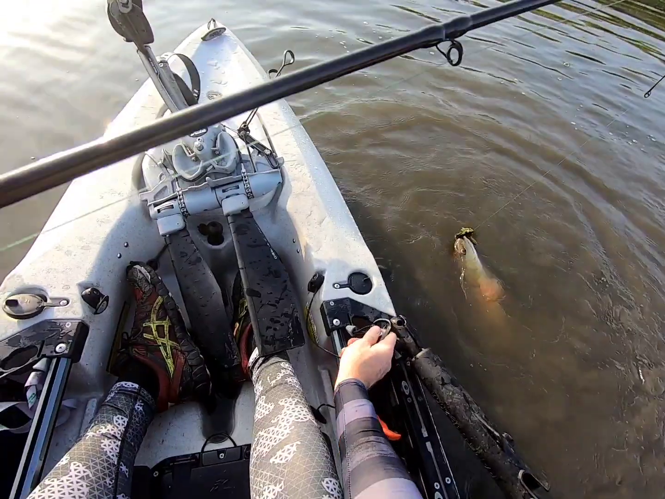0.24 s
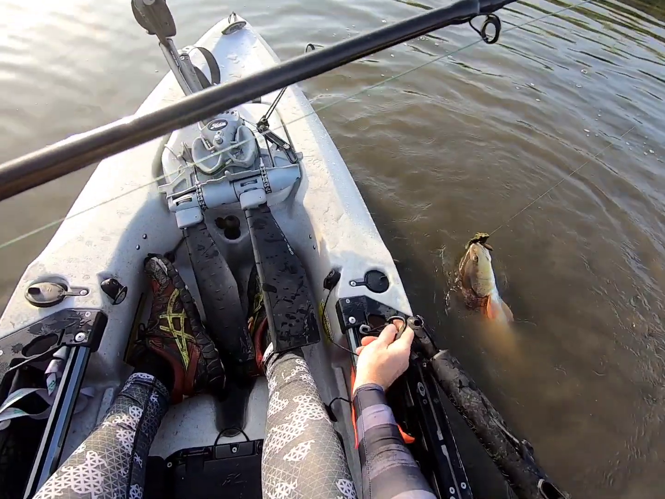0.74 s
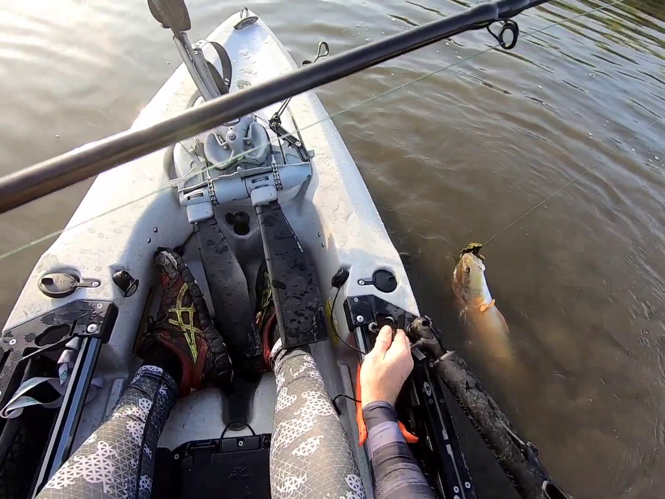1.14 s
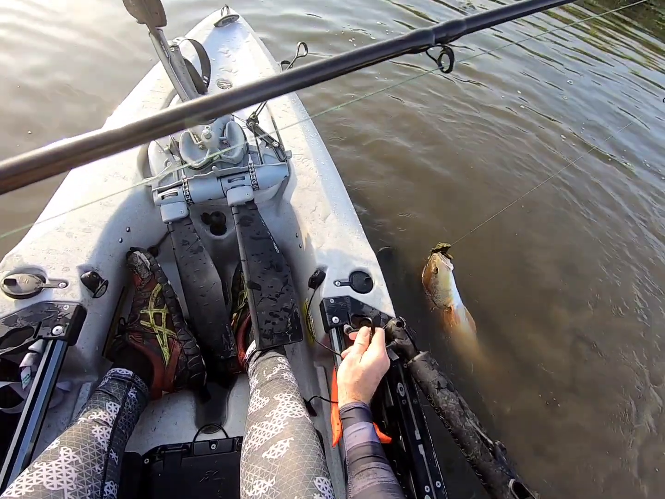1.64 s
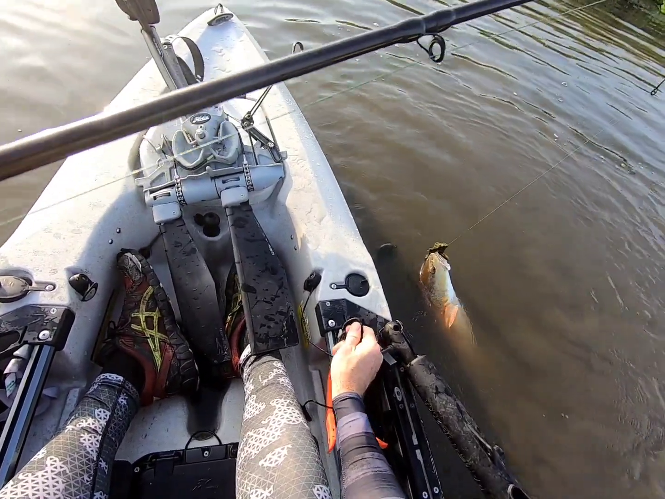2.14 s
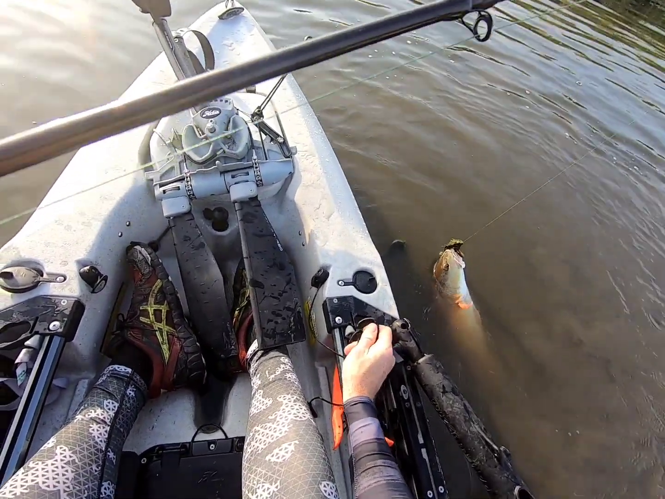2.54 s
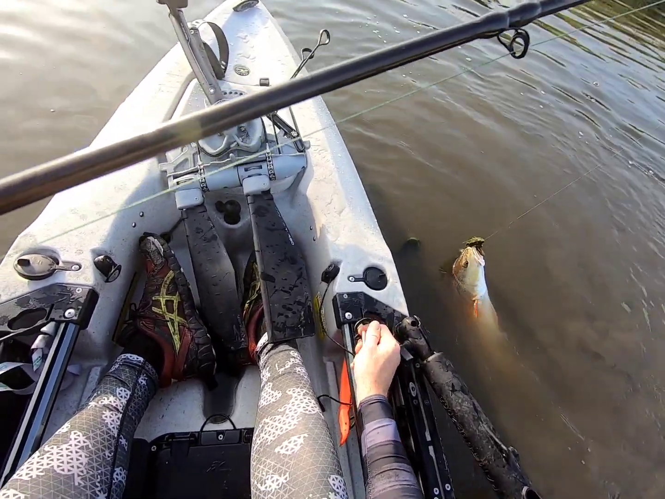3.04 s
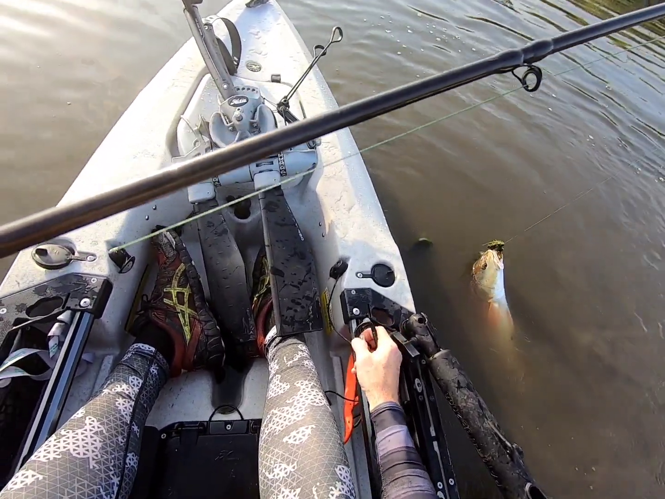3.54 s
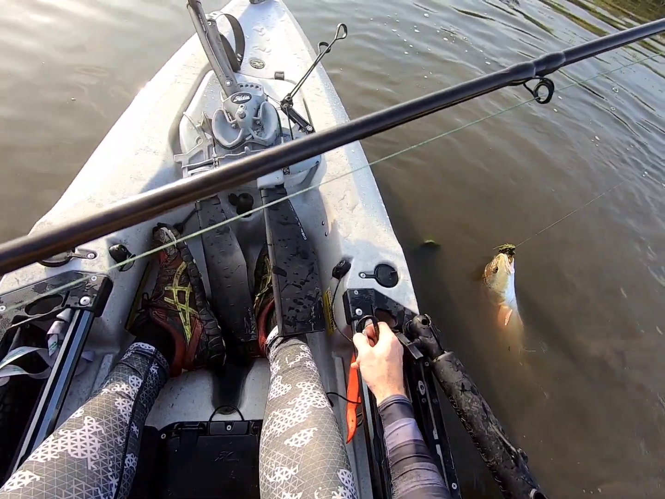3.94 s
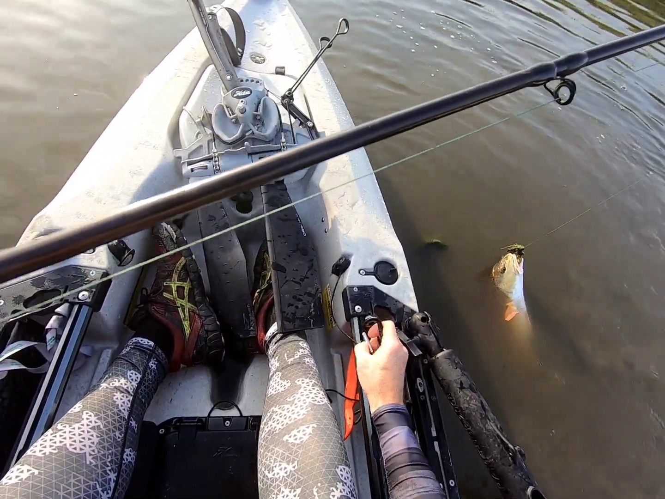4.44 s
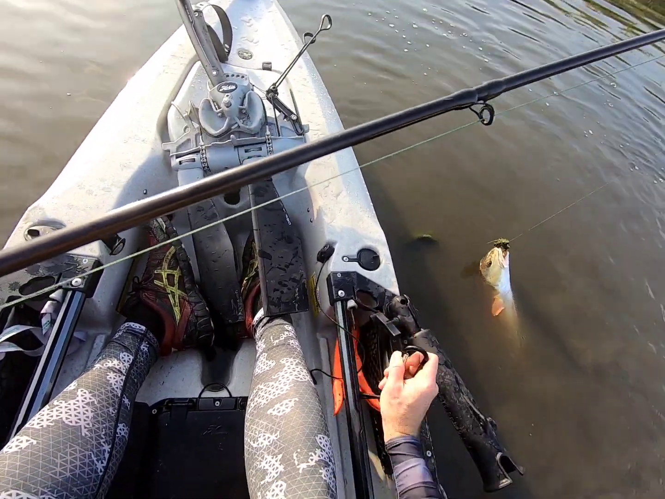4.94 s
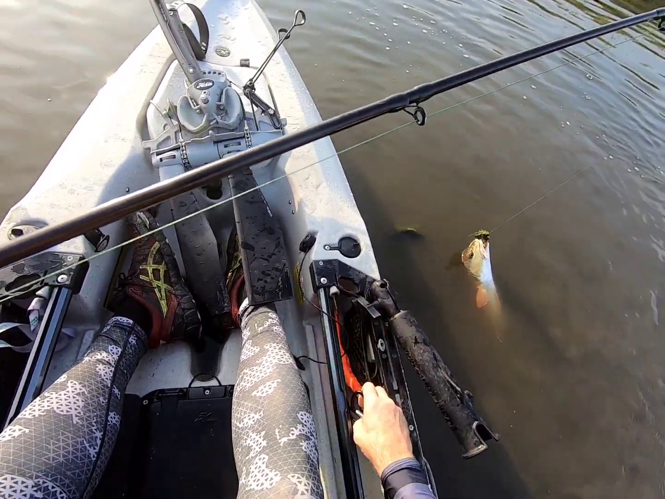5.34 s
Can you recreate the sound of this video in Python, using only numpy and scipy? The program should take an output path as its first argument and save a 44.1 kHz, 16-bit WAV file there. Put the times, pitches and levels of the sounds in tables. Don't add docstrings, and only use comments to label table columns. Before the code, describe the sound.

Steady high insect drone around a small hollow boat, with wind rumbling on the microphone, small knocks and water plops, then a loud booming double thump at the end.

```python
import sys
import numpy as np
from scipy import signal
from scipy.fft import rfft, irfft, next_fast_len
from scipy.io import wavfile
from scipy.ndimage import uniform_filter1d, map_coordinates

SR = 44100
rng = np.random.default_rng(int(sys.argv[2]) if len(sys.argv) > 2 else 0)


def persist_wave(psi):
    counts = np.round(np.clip(psi, -1, 1) * 32767).astype(np.int16)
    wavfile.write(sys.argv[1], SR, np.atleast_2d(counts).T)


def to_linear_factor(level_db):
    exponent = np.asarray(level_db, float) / 20
    return 10 ** exponent


N = 246367


def unit(x):
    return x / np.sqrt(np.mean(x ** 2) + 1e-20)


def along(points, hz):
    f, v = np.transpose(points)
    return np.interp(np.log(hz + 1), np.log(f + 1), v)


def curves(rows):
    s, *cols = np.transpose(rows)
    return [np.interp(np.arange(N) / SR, s, c) for c in cols]


def wobble(rate):
    knots = rng.standard_normal(int(N * rate / SR) + 4)
    return map_coordinates(knots, [np.arange(N) * rate / SR])


def filtered(x, response):
    m = next_fast_len(N + 8192)
    return irfft(rfft(x, m) * response(np.fft.rfftfreq(m, 1 / SR)), m)[..., :N]


def panned(db):
    return to_linear_factor(np.multiply.outer([.5, -.5], db))


def rush(spectrum, alike, patchy_db):
    z = signal.stft(rng.standard_normal((2, N)), nperseg=512)[2]
    field = uniform_filter1d(rng.standard_normal(z.shape[1:]), size=5, axis=0)
    field = uniform_filter1d(field, size=8, axis=1)
    pair = signal.istft(z * to_linear_factor(patchy_db * unit(field)), nperseg=512)[1][:, :N]

    def mid_side_response(hz):
        turn = np.arccos(np.clip(along(alike, hz), -1, 1)) / 2
        return to_linear_factor(along(spectrum, hz)) * [np.cos(turn), np.sin(turn)]

    mid, side = filtered(pair, mid_side_response)
    return unit(np.array([mid + side, mid - side]))


def add(track, s, sound):
    part = track[..., round(s * SR):][..., :sound.shape[-1]]
    part += sound[..., :part.shape[-1]]


def strokes(rows, rise, fall):
    t = np.arange(N) / SR
    total = np.zeros(N)
    for s, length, db in rows:
        onset = np.clip((t - s) / rise, 0, 1)
        release = np.exp(-np.clip(t - s - length, 0, None) / fall)
        total += to_linear_factor(db) * onset * release
    return total


# time in seconds, level in dB.
CHORUS_LEVEL = [(0, -46), (2, -46), (3.5, -45), (5.59, -46)]
# frequency in Hz, level in dB per Hz.
WING_RESONANCE = [(3060, -75), (5200, -42.5), (5940, -22), (6260, -10.5), (6480, -2), (6800, 4.5),
                  (7150, -4), (7270, -20), (7510, -23.5), (7630, -31), (9000, -52.5), (11700, -82),
                  (19800, -120)]


def insects(count=30):
    clicks = np.zeros((2, N))
    for rate, lag, side in rng.random((count, 3)):
        clicks_per_s = 170 + 160 * rate
        gaps = SR / clicks_per_s * (1 + .3 * rng.standard_normal(N // 100))
        times = np.cumsum(gaps).astype(int)
        at = times[(times >= 0) & (times < N - 8)]
        size = to_linear_factor(1.7 * wobble(12))[at]
        delay = round(1.7 + 3.9 * lag)
        clicks[0, at] += size * np.cos(np.pi / 2 * side)
        clicks[1, at + delay] += size * np.sin(np.pi / 2 * side)
    song = filtered(clicks, lambda hz: to_linear_factor(along(WING_RESONANCE, hz)))
    level = to_linear_factor(curves(CHORUS_LEVEL)[0] + 3.5)
    return level * panned([-5.8]) * np.array([unit(port) for port in song])


# start in seconds, hold in seconds, strength in dB, left minus right in dB.
GUST_EVENTS = [(0, 0.13, -44.5, -12), (0.28, 0.15, -50.5, 4), (0.708, 0.14, -38, -15.5),
               (0.883, 0.14, -39, -12), (1.057, 0.31, -41, -4.5), (1.41, 0.44, -47, -12),
               (1.974, 0.22, -45, -6), (2.173, 0.1, -50.5, 2), (2.44, 0.03, -55, -14.5),
               (0.515, 0.056, -55.5, -2), (4.4, 0.061, -61, -5), (3.288, 0.056, -50, -10),
               (3.601, 0.072, -53, 2.5), (3.788, 0.063, -48.5, -14), (4.566, 0.22, -43, 7),
               (4.688, 0.031, -29.5, -11.5), (4.786, 0.066, -33.5, 6), (5.09, .12, -57, -5),
               (5.262, 0.077, -46, -11), (5.417, .2, -32.5, -6.5)]


def gusts():
    s, hold, db, pan_db = np.transpose(GUST_EVENTS)[..., None]
    t = np.arange(N) / SR
    rise_db_per_s, fall_db_per_s, calm_db = 397, 273.5, -77.5
    before = np.clip(s - t, 0, None)
    after = np.clip(t - s - hold, 0, None)
    power = to_linear_factor(db - rise_db_per_s * before - fall_db_per_s * after) ** 2
    total = power.sum(axis=0) + to_linear_factor(calm_db) ** 2
    return 10 * np.log10(total), (power * pan_db).sum(axis=0) / total


# frequency in Hz, level in dB per Hz.
BUFFET_SPECTRUM = [(12, -27.5), (20, 0.5), (54, 2.5), (88, -5), (119, -8), (327, -31.5), (400, -37.5),
                   (520, -49.5), (880, -120)]


def wind():
    buffet_db, pan_db = gusts()
    lumps = to_linear_factor(2.7 * np.array([wobble(22.0), wobble(22.29)]))
    full = unit(lumps * rush(BUFFET_SPECTRUM, [(30, 0.058)], patchy_db=2.0))
    deep = filtered(full, lambda hz: 1 / (1 + (hz / 75) ** 4))
    strong = np.clip((buffet_db + 57) / 14, 0, 1)
    return to_linear_factor(buffet_db) * panned(pan_db) * (deep + strong * (full - deep))


# time in seconds, strength in dB.
BREEZE_STRENGTH = [(0, -84), (.8, -85), (1.25, -88.5), (1.5, -91.5), (2.2, -93), (3.0, -92.5),
                   (3.06, -89.5), (3.5, -87), (4.6, -88), (4.8, -91), (5.1, -84), (5.35, -89), (5.59, -78)]
# frequency in Hz, level in dB per Hz.
REED_SPECTRUM = [(5470, -42), (9300, -1), (9500, -6), (10200, -0.5), (10700, -1), (11700, -5.5),
                 (12900, -2.5), (13600, -4), (14200, -8), (15500, -12.5)]
# frequency in Hz, level in dB per Hz.
MARSH_SPECTRUM = [(35, -26), (60, -4), (112, -11), (259, -4), (532, -16.5), (608, -7.5), (1030, -11.5),
                  (1270, -20), (1400, -16.5), (2520, -32.5), (5600, -31), (7280, -46.5), (12300, -120)]
# frequency in Hz, left-right likeness from -1 to 1.
MARSH_COHERENCE = [(60, 0.49), (180, 0.038), (550, -0.89), (1650, -0.99), (4970, 0.46), (15000, -0.41)]


def marsh():
    breeze = to_linear_factor(curves(BREEZE_STRENGTH)[0] + 5.5)
    reeds = breeze * rush(REED_SPECTRUM, [(9000, 0.071)], patchy_db=2.5)
    return reeds + to_linear_factor(-66.5) * rush(MARSH_SPECTRUM, MARSH_COHERENCE, patchy_db=1.0)


# time in seconds, effort in dB.
HAND_EFFORT = [(0, -58.5), (.19, -54.5), (.37, -64.5), (.61, -64), (.75, -48), (.86, -56.5), (1.2, -56),
               (1.6, -68), (2.0, -66), (2.35, -62), (2.8, -72.5), (3.15, -62.5), (4.05, -69.5), (4.33, -65),
               (4.76, -60), (4.86, -48), (5.33, -51), (5.59, -34.5)]
# frequency in Hz, level in dB per Hz.
RUMBLE_SPECTRUM = [(59, -41.5), (100, -10.5), (199, 5.5), (232, -2), (322, 1), (438, -17.5), (509, -22),
                   (600, -16.5), (780, -51), (1320, -120)]
# frequency in Hz, level in dB per Hz.
RUSTLE_SPECTRUM = [(240, -35), (400, -9), (447, -4.5), (650, -9), (767, -3), (1190, -12.5), (1640, -13.5),
                   (2730, -20), (3520, -17.5), (4300, -24), (5600, -25), (7280, -51.5), (12300, -120)]


def handling():
    rumble_db, = curves(HAND_EFFORT)
    usual_effort_db, growth = -60.5, 0.93
    rustle_db = -68.5 + growth * (rumble_db - usual_effort_db)
    slip = wobble(35)
    rumble = rush(RUMBLE_SPECTRUM, [(150, 0.87), (300, 1.0)], patchy_db=3.0)
    rumble = unit(to_linear_factor(4.5 * slip) * rumble)
    rustle = rush(RUSTLE_SPECTRUM, [(500, 0.17), (3000, 0.44)], patchy_db=3.5)
    rustle = unit(to_linear_factor(0.53 * slip + 0.91 * wobble(130)) * rustle)
    return panned([-1.5]) * (to_linear_factor(rumble_db) * rumble + to_linear_factor(rustle_db) * rustle)


# start in seconds, peak in dB, pitch in Hz, left minus right in dB.
SLAP_EVENTS = [(0.031, -37.5, 73, -33.5), (0.691, -36, 62.5, -14), (0.804, -22.5, 61.8, -11),
               (0.832, -26, 100, -15), (0.891, -34, 81, -15), (0.963, -33, 62.3, -28),
               (1.144, -40, 62.5, -17), (1.311, -33.5, 123, -36.5), (1.417, -36, 91, -23.5),
               (1.527, -35.5, 68, -24), (1.622, -32, 63.5, -22), (1.699, -35, 85, -18),
               (1.783, -42, 71, -29), (2, -33.5, 69, -25.5), (2.122, -31.5, 102, -2),
               (2.457, -40.5, 70, -15), (2.509, -45.5, 50.4, -16), (3.288, -46.5, 61.5, -20),
               (3.328, -51, 61, -16), (3.799, -36, 29.6, -18), (3.851, -36.5, 31, -15),
               (4.669, -29, 76, 12), (4.718, -25, 63, -22), (4.795, -29.5, 169, 19), (4.807, -23, 68.4, 5),
               (5.4003, -21, 110, -16.5), (5.4484, -18.5, 109, -22), (5.466, -21, 187, -18),
               (5.535, -21, 70.0, -17), (5.548, -34, 72.7, -8)]


def slaps():
    out = np.zeros((2, N))
    for s, db, hz, pan_db in SLAP_EVENTS:
        u = np.arange(round(2 * SR / hz)) * hz / SR - .7
        soft_start = 1 - np.exp(-((u - u[0]) / 0.2) ** 2)
        dip = -np.cos(2 * np.pi * u) * np.exp(-(u / 0.56) ** 2) * soft_start
        add(out, s, panned([pan_db]) * to_linear_factor(db - 4.5) * dip)
    return out


# start in seconds, length in seconds, level in dB.
DRAG_EVENTS = [(0.134, 0.13, -63), (0.544, 0.077, -59), (0.626, 0.12, -62), (0.732, 0.05, -52.5),
               (4.018, 0.056, -56), (4.826, 0.053, -69), (1.65, .07, -68), (3.76, .14, -69),
               (2.403, 0.026, -60.5), (2.356, 0.017, -66), (2.866, 0.042, -63), (5.273, 0.026, -47),
               (5.337, 0.2, -53), (5.51, 0.079, -60)]


def drags():
    grains = to_linear_factor(1.5 * wobble(74) + 1.0 * wobble(300))
    rub = rush(RUSTLE_SPECTRUM, [(500, 0.23), (3000, 0.82)], patchy_db=4.0)
    return strokes(DRAG_EVENTS, rise=0.0064, fall=0.015) * unit(grains * rub)


# start in seconds, length in seconds, level in dB.
SPRAY_EVENTS = [
    (4.017, 0.058, -55.5),
    (5.128, .03, -70),
    (6.3, .02, -66),
    (5.525, .08, -61.5),
    (.18, .03, -74),
]
# frequency in Hz, level in dB.
SPRAY_SPECTRUM = [(3000, -32), (6000, 0.5), (8500, 1), (10000, -3), (11000, -14), (15500, -24)]


def sprays():
    grains = to_linear_factor(3.0 * wobble(370)) * rush(SPRAY_SPECTRUM, [(9000, .2)], patchy_db=-5.0)
    return strokes(SPRAY_EVENTS, rise=.02, fall=0.011) * unit(grains)


def drifting_rings(rows, attack, pan_db):
    out, t = np.zeros((2, N)), np.arange(SR // 5) / SR
    for s, db, hz, t60, drift in rows:
        tone = np.sin(2 * np.pi * hz * (t + drift * t * t / t60))
        envelope = to_linear_factor(db + 1.0 - 60 * t / t60) * (1 - np.exp(-t / attack))
        add(out, s, panned([pan_db]) * envelope * tone)
    return out


# start in seconds, peak in dB,
# pitch in Hz, t60 in seconds, pitch drift share.
PLOP_EVENTS = [(.253, -49, 1370, 0.038, .15), (.314, -40, 1370, 0.044, -0.2), (.79, -48, 774, 0.13, -0.21),
               (.838, -40, 695, 0.027, -.032), (1.0245, -27.5, 950, 0.025, -0.012),
               (1.021, -28, 467, 0.037, 0.085), (1.06, -46.5, 506, 0.081, .037),
               (1.2, -46.5, 754, 0.082, -0.059), (4.033, -23.5, 880, 0.023, -0.037),
               (4.694, -44, 870, 0.025, 0), (.18, -60, 7600, .08, 0), (5.2945, -42, 2600, .03, 0),
               (4.855, -54, 3500, .06, 0)]


def plops():
    return drifting_rings(PLOP_EVENTS, attack=0.0034, pan_db=-5.5)


# start in seconds, strength in dB, panel in Hz, fitting in Hz, sharpness in dB.
BLOW_EVENTS = [(0.6834, -44, 148, 2320, 1), (0.7197, -57.5, 327, 2840, 19.5), (0.7415, -33.5, 210, 1880, 2),
               (0.7576, -50, 263, 2140, 1), (2.413, -46.5, 291, 1540, 1), (4.0292, -43, 388, 2100, 3),
               (4.0476, -46, 254, 2210, -15), (4.957, -58, 330, 1940, -3), (5.2774, -40, 198, 1670, 5.5),
               (5.2962, -38, 216, 1300, -3), (5.3425, -47, 188, 1780, 5.5), (5.3551, -38.5, 320, 2530, -8),
               (5.3788, -39.5, 197, 3030, -1), (5.4263, -43, 198, 1920, 0.5), (5.4897, -26, 300, 3640, 5.5),
               (5.5121, -24.5, 209, 2300, 1.5)]
# start in seconds, strength in dB, panel in Hz, deck over panels in dB.
BUMP_EVENTS = [(0.215, -49, 201, -30), (0.587, -49, 250, -25), (0.8653, -43.5, 296, 0.5),
               (1.0253, -47, 430, 7), (1.5617, -49, 169, 2.7), (1.7121, -57, 162, -1.5),
               (1.998, -48.5, 157, -5.5), (2.0591, -57, 287, 4.5), (2.205, -51.5, 151, -7),
               (2.362, -42.5, 336, -2), (2.4384, -52, 169, 4.5), (2.8706, -70.5, 193, 9.5),
               (3.0973, -58, 293, 2.5), (4.1382, -56.5, 253, 3), (4.2533, -52, 168, -2),
               (4.2823, -50.5, 440, 2.2), (4.5351, -55.5, 172, -1.5), (4.568, -53, 302, 6),
               (4.61, -48, 308, 3.5)]
# start in seconds, strength in dB, fitting in Hz, panels over fitting in dB.
TAP_EVENTS = [(0.311, -52, 1830, -6.5), (0.553, -58.5, 3500, 5.5), (0.662, -46, 3430, -10),
              (0.9766, -50, 3430, -5), (1.0266, -51.5, 1980, -11), (1.766, -49, 3250, -21),
              (2.1338, -52, 3680, -2.5), (2.551, -56, 3140, -12), (2.8789, -30.5, 2600, -28),
              (2.8822, -44.5, 2460, -22), (3.312, -49.5, 2030, -32), (4.0701, -33, 3060, -21.5),
              (5.157, -45, 2460, -7), (5.1818, -45.5, 2130, -5.5), (5.232, -46, 2900, -19),
              (0.361, -59, 2880, -15), (0.454, -60, 3100, -18), (4.2522, -54.5, 2920, -11),
              (4.846, -52, 3500, -18), (4.861, -53, 3500, -21), (2.911, -60, 4000, -3)]


def contacts():
    rows = []
    for s, db, panel_hz, fitting_hz, sharp_db in BLOW_EVENTS:
        rows.append((s, db + sharp_db, fitting_hz, db, db + 2.5, panel_hz))
    for s, db, panel_hz, deck_db in BUMP_EVENTS:
        rows.append((s, db - 19.5, 2100, db, db + deck_db, panel_hz))
    for s, db, fitting_hz, body_db in TAP_EVENTS:
        rows.append((s, db, fitting_hz, db + body_db, db + body_db - 24, 194.5))
    return rows


def ring(modes, t, attack):
    hz, db, t60 = np.transpose(modes)[..., None]
    luck = rng.standard_normal((2, len(modes), 1))
    decay = to_linear_factor(db + 2.9 * luck[0] - 60 * t / t60)
    x = np.sum(decay * np.sin(2 * np.pi * hz * (1 + 0.045 * luck[1]) * t), axis=0)
    x = x * (1 - np.exp(-t / attack))
    return x / np.abs(x).max()


def burst(colour, t, t60, attack):
    spectrum = rfft(rng.standard_normal(len(t)))
    gain = to_linear_factor(along(colour, np.fft.rfftfreq(len(t), 1 / SR)))
    x = irfft(spectrum * gain, len(t)) * to_linear_factor(-60 * t / t60) * (1 - np.exp(-t / attack))
    return x / np.abs(x).max()


# frequency in Hz, level in dB, t60 in seconds.
PANEL_MODES = [(169.2, -2, 0.15), (213.5, -4, 0.18), (259.8, 3, 0.08), (320, 3.5, 0.065),
               (396.3, -10, 0.18)]
# frequency in Hz, level in dB, t60 in seconds.
DECK_MODES = [(501, 6, 0.048), (740, -5, 0.038), (880, 7, 0.027), (962, 6.5, 0.024), (1336, -7, 0.036)]
# frequency in Hz, level in dB, t60 in seconds.
FITTING_MODES = [(1704, -1.5, 0.02), (2340, -9, 0.014), (2480, 11.5, 0.017), (3300, -7, 0.01),
                 (3840, -4.5, 0.006), (4900, -13.5, 0.004)]
# frequency as a share of the fitting's pitch, level in dB.
SNAP_SPECTRUM = [(.2, -55.5), (.45, -17), (.8, -5), (1, -0.5), (1.3, -7), (1.7, -16), (2.8, -42.5),
                 (5, -63)]
# frequency in Hz, level in dB.
RAP_SPECTRUM = [(150, -50), (280, -28), (450, 6), (800, 6.5), (1200, -9.5), (1800, -32.5), (4000, -71)]


def knocks():
    out, t = np.zeros(N), np.arange(SR // 5) / SR
    for s, click_db, click_hz, thud_db, knock_db, panel_hz in contacts():
        thud = ring([(panel_hz, 7, .065)] + PANEL_MODES, t, attack=0.0036)
        deck = ring(DECK_MODES, t, attack=0.0038)
        rap = burst(RAP_SPECTRUM, t, 0.061, attack=0.0017)
        fitting = ring([(click_hz, 7, .015)] + FITTING_MODES, t, attack=0.00094)
        snap = burst(np.multiply(SNAP_SPECTRUM, [click_hz, 1]), t, 0.019, attack=0.0014)
        add(out, s, to_linear_factor(thud_db + 6.0) * thud)
        add(out, s, to_linear_factor(knock_db + 4) * (0.43 * deck + 0.41 * rap))
        add(out, s, to_linear_factor(click_db - 3.0) * (0.31 * fitting + 1.07 * snap))
    return out * panned([-1.5])


# start in seconds, peak in dB, left minus right in dB.
TICK_EVENTS = [(0.6695, -65.5, 22.5), (1.6057, -65, 18), (3.5982, -59, -11), (4.028, -52, 5.5),
               (4.053, -55.5, -13), (4.0714, -44, -0.5), (4.5316, -55, 20), (4.574, -55, -25),
               (5.1357, -58, 6), (5.4882, -47.5, 3.5), (5.551, -56, 4)]
# frequency in Hz, level in dB.
TICK_SPECTRUM = [(3000, -45), (6000, 8), (8500, 7), (12000, -10.5), (15500, -14)]


def ticks():
    out, t = np.zeros((2, N)), np.arange(SR // 20) / SR
    for s, db, pan_db in TICK_EVENTS:
        decay = to_linear_factor(db + 3.0 - 60 * t / 0.012)
        add(out, s, panned([pan_db]) * decay * rng.standard_normal((2, len(t))))
    return filtered(out, lambda hz: to_linear_factor(along(TICK_SPECTRUM, hz)))


# start in seconds, peak in dB, lag at 1 kHz in seconds, upper roll-off in Hz.
BEND_EVENTS = [
    (0.7404, -33, .0025, 1500),
    (2.3603, -43, .002, 596),
    (4.0275, -37.5, .003, 1800),
    (5.353, -36, .003, 1200),
    (5.489, -12.5, .0026, 2400),
    (5.5099, -21, .002, 2500),
]


def bends():
    out, hz = np.zeros(N), np.fft.rfftfreq(4096, 1 / SR)
    low = (hz / 448) ** 2
    for s, db, lag, top_hz in BEND_EVENTS:
        colour = low / (1 + low) / (1 + (hz / top_hz) ** 4) / (1 + hz / 900)
        phase = -4 * np.pi * lag * np.sqrt(1000 * hz)
        wave = irfft(colour * np.exp(1j * phase))[:SR // 30]
        add(out, s, to_linear_factor(db) * wave / np.abs(wave).max())
    return out * panned([-1.5])


# start in seconds, peak in dB, pitch in Hz, t60 in seconds, pitch drift
BOOM_EVENTS = [
    (.742, -33.5, 281, 0.073, -0.35),
    (5.281, -21.5, 192, 0.11, 0.073),
    (5.4908, -13.5, 767, 0.034, -0.072),
    (5.493, -6.5, 294.3, 0.044, -0.11),
    (5.5147, -7, 214, 0.11, -0.14),
    (5.4897, -17, 2550, .018, -.03),
    (5.5113, -23, 3000, .02, 0),
    (5.5103, -16, 900, .02, -.1),
    (5.513, -16, 542, 0.034, -.1),
]


def booms():
    return drifting_rings(BOOM_EVENTS, attack=0.0021, pan_db=-1.5)


def cockpit(x):
    t = np.arange(SR // 8) / SR
    tail = rng.standard_normal((2, len(t))) * to_linear_factor(-60 * t / 0.088)
    return signal.fftconvolve(x, tail / np.linalg.norm(tail[0]), axes=1)[:, :N]


def scene():
    steady = insects() + wind() + marsh() + handling() + drags() + sprays()
    near = plops() + knocks() + bends()
    boom = booms()
    scattered = cockpit(to_linear_factor(-9) * near + to_linear_factor(-20) * boom)
    return steady + slaps() + ticks() + near + boom + scattered


def roll_off(x):
    return signal.sosfilt(signal.butter(12, 15720, fs=SR, output="sos"), x)


def record(dry):
    fade = np.clip(np.minimum(np.arange(N), N - np.arange(N)) / (.003 * SR), 0, 1)
    rounded = dry / (1 + np.abs(dry / .6) ** 4) ** (1 / 4)
    band = filtered(rounded, lambda hz: hz < 15730)
    return roll_off(band * fade)


dry = scene()
out = record(dry)
persist_wave(out)
```